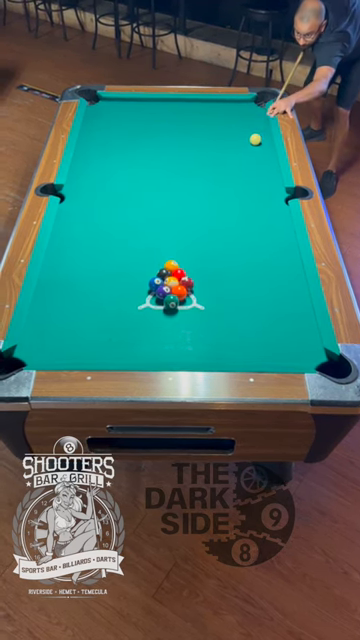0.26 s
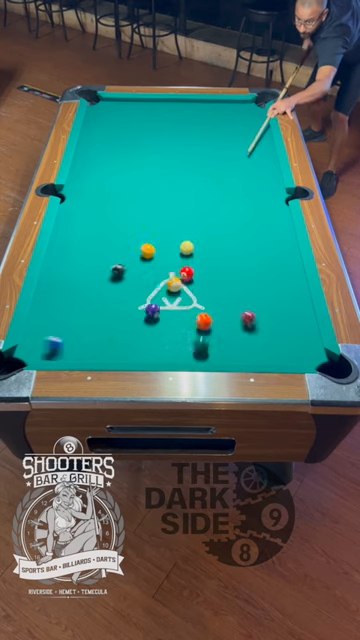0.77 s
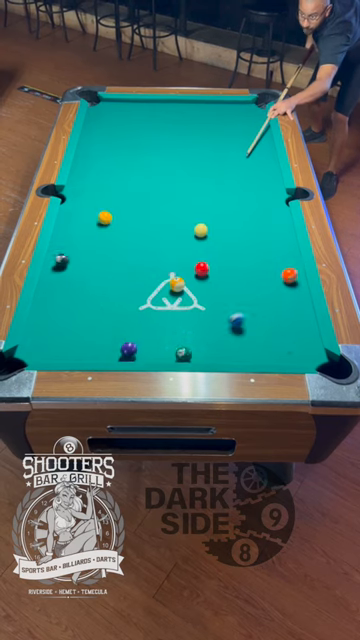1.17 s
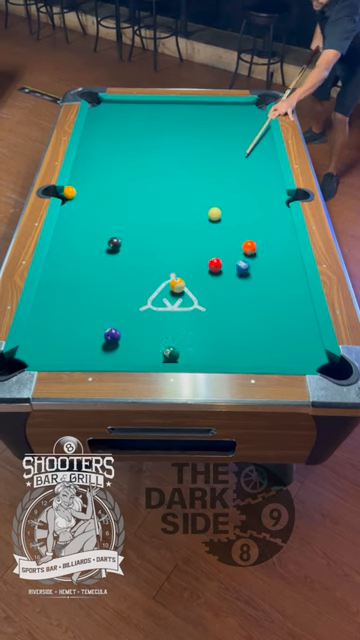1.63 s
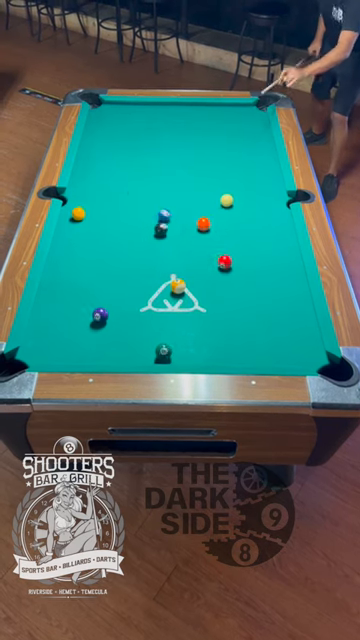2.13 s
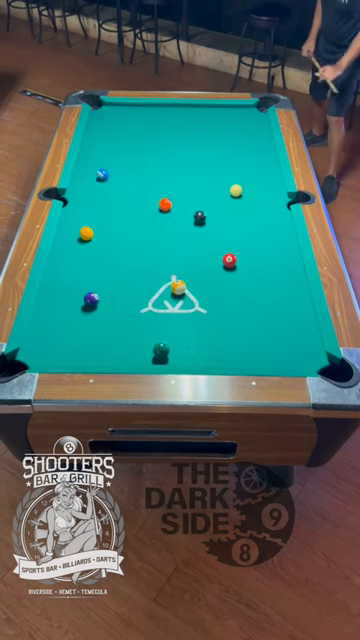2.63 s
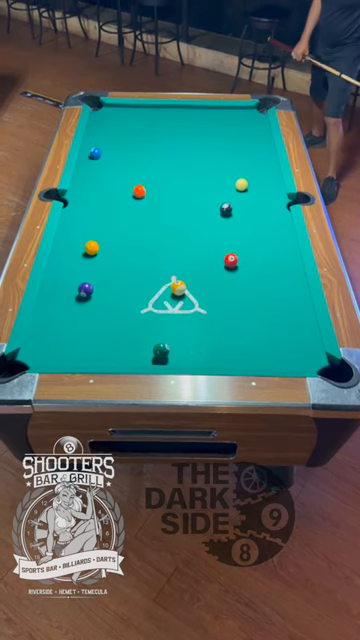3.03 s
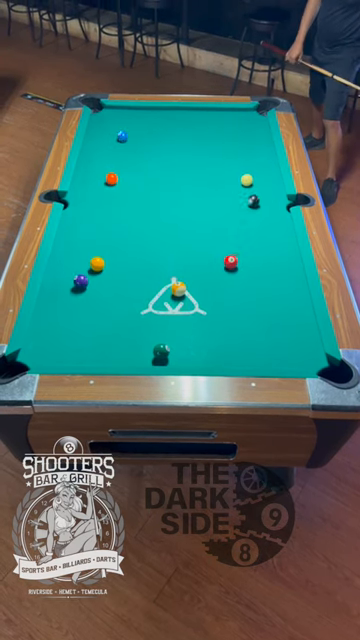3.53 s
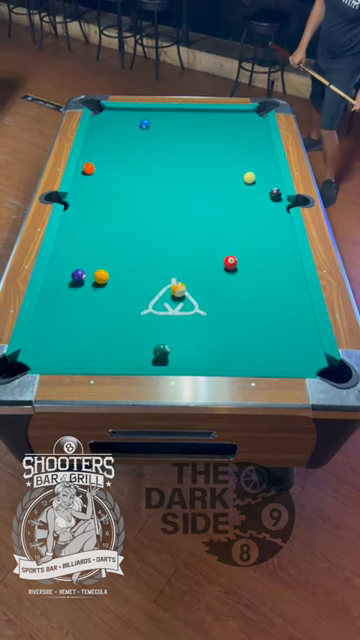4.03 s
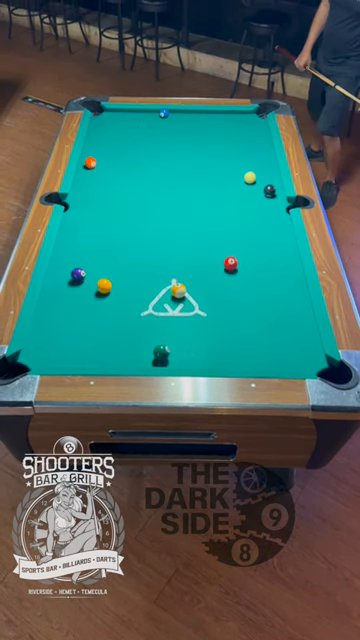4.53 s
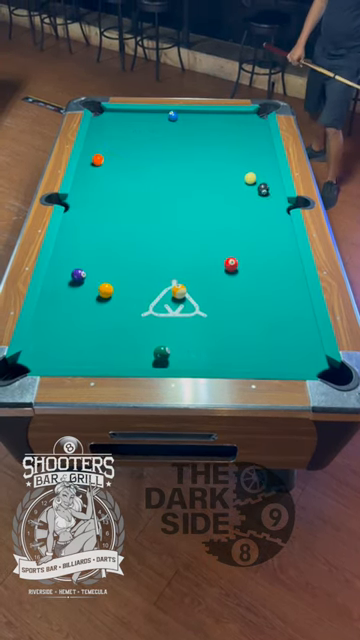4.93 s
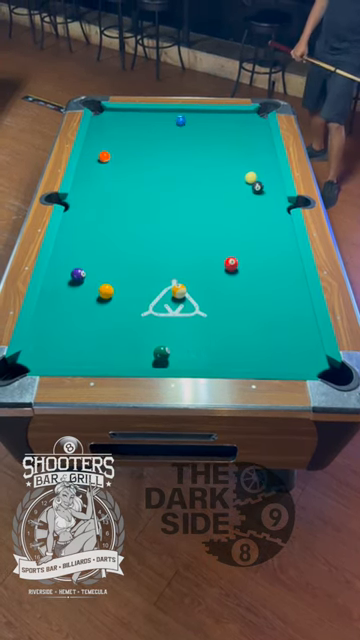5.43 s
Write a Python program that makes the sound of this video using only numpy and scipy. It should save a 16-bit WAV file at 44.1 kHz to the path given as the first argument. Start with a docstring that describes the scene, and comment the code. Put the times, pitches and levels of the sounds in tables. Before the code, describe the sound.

A cue snaps into a ball, a huge sharp pool break cracks, then lighter clacks and hollow wooden knocks as pocketed balls drop and roll away.

```python
"""Low rumble and faint hiss of a quiet bar, then a break shot on a coin-operated pool table.
The cue strikes (dull knock, bright snap in the room); the cue ball hops and cracks into the rack,
a mid-band noise swelling just before. Balls clack (pulses, reflections) and thump cushions (low modes).
Pocketed balls knock on the wooden return (cabinet modes) and roll down it (noise through those modes).
A limiter ducks at the loud peaks and recovers."""
import sys
import numpy as np
from scipy import signal
from scipy.fft import rfft, irfft
from scipy.io import wavfile
from scipy.ndimage import uniform_filter1d, minimum_filter1d

SR = 44100
rng = np.random.default_rng(int(sys.argv[2]) if len(sys.argv) > 2 else 0)


def materialize(psi):
    """Save the field psi as 16-bit PCM at rate SR to the path in sys.argv[1].

    A 1-D psi becomes a single channel; in a 2-D psi each row is a channel.
    """
    bounded = np.clip(np.atleast_2d(psi).T, -1, 1)
    quanta = np.round(bounded * 32767).astype(np.int16)
    wavfile.write(sys.argv[1], SR, quanta)


N = 251007

# background level: t/s, rumble of room and of balls on the cloth/dB, hiss/dB
AIR_LEVELS = [(.4, -51.5, -66.5), (.65, -46.5, -59), (1.1, -51.5, -75), (3.1, -54, -77), (5.69, -57, -74)]
# background spectra: f/Hz, level/dB
RUMBLE_SPECTRUM = [(20, -31), (40, -12), (60, -9.5), (85, -3), (120, 1), (170, -11), (300, -9.5),
                   (500, -16), (800, -21), (1500, -31), (2500, -40.5), (5000, -70)]
HISS_SPECTRUM = [(300, -12.5), (1500, 5), (3000, -1.5), (6500, -9), (8500, -17), (11000, -31.5),
                 (16000, -33.5)]
# bar reverberation: f/Hz, t60/s
BAR_DECAY = [(60, 1.15), (150, 0.96), (400, 0.3431), (1000, 0.4274), (2500, .5), (6000, 0.5), (14000, 0.28)]
# stereo width of the diffuse field: f/Hz, side-to-mid/dB
STEREO_WIDTH = [(50, -20.5), (140, -17), (260, -10), (600, -3), (1200, -1.5), (2000, -3), (4000, -0.5),
                (8000, -1)]

# cue tip on cue ball: t/s, level/dB, room/dB
CUE_STRIKES = [(0.4279, -13.5, -10.5)]
# tip knock and shaft snap spectra: f/Hz, level/dB
TIP_SPECTRUM = [(60, -27), (200, 2), (400, -0.5), (900, 7.5), (1400, -2), (2200, -22.5), (5000, -25.5),
                (15000, -47.5)]
SHAFT_SPECTRUM = [(60, -22), (200, 1.5), (500, 1), (1200, -7.5), (2400, -12.5), (5000, -8.5), (8000, -10),
                  (11000, -15), (15500, -16)]
# tip and shaft resonances: f/Hz, width/Hz, lift/dB
TIP_RESONANCES = [(250, 80, 8.6), (515, 130, 7), (720, 130, 6), (1960, 180, 20)]
SHAFT_RESONANCES = [(905, 110, 7), (1350, 26, 13), (1504, 40, 22.5), (2900, 200, 7.5), (3560, 610, 7.5),
                    (4330, 46, 9), (5350, 18, 12), (6860, 27, 15)]

# ball on cushion or slate: t/s, level/dB, hardness/dB
CUSHION_HITS = [(.428, -41, -3.5), (0.547, -36.5, 12.5), (0.607, -25, 14.5), (.719, -19.5, 16),
                (3.26, -44.5, 0.5)]
# cushion spectrum: f/Hz, level/dB
CUSHION_SPECTRUM = [(30, -31), (60, -5), (130, -6), (200, -7), (320, -12), (700, -17), (1200, -25),
                    (2500, -40.5), (8000, -69)]
# table resonances: f/Hz, width/Hz, lift/dB
TABLE_RESONANCES = [(57, 11, 2), (104.5, 18, 4.4), (154.3, 11.2, 14.25)]

# single knock on wood or slate, in a hop or against the return's wall:
# t/s, level/dB, bass/dB, treble/dB, main resonance f/Hz, its lift/dB, room/dB
SINGLE_KNOCKS = [(.4935, -29.5, 3, -15, 923, 8, -33), (3.154, -50.5, 1, -8.5, 500, 12, -1),
                 (3.265, -44.5, 1, -11, 1310, 10, -20), (4.02, -41.5, -7.5, -14.5, 1830, 8.5, -9),
                 (4.811, -49, -3.5, -12, 1450, 15, -12.5), (4.992, -45.5, 8, -10, 553, 12, -22),
                 (5.119, -40.5, -6.5, -15, 1570, 6, -25), (5.243, -31.5, -13, 14, 1945, 21, -29),
                 (5.416, -38.5, -10, 6.5, 1660, 20, -15), (5.424, -36, -11, -7.5, 2020, 17.5, -10.5)]
# ball drops into a pocket or down a step of the return, lands and bounces:
# t/s, level/dB, bass/dB, treble/dB, main resonance f/Hz, its lift/dB, table boom/dB
BALL_DROPS = [(1.052, -31.5, -16.5, -6, 1520, -3, -62), (1.057, -23.5, -8.5, -23, 850, 5, -52),
              (1.079, -31, -9.5, -13, 291, 13.5, -37.5), (2.515, -24, -10, -1, 979, 8.5, -31.5),
              (2.555, -22, -3, -2, 1410, 2, -31), (2.564, -22.5, -3.5, -6, 504, 2, -42.5),
              (2.683, -32, -1, 7.5, 2430, 7.5, -38), (2.693, -23.5, -10, -0.5, 1645, 4.5, -33.5),
              (2.723, -28.5, 3.5, -3.5, 1310, 11, -32), (2.759, -30, -11.5, -8, 421, 9.5, -48),
              (2.818, -36.5, -1.5, -6, 490, -3, -45), (4.272, -27.5, -1.5, -3, 193, 16.5, -34),
              (4.326, -28, 5, 1, 970, 4, -32), (4.36, -42, 12, -1, 1450, -9, -40.5),
              (4.633, -37, 9, -13.5, 665, 5.5, -56.5), (4.672, -42, 0, -23.5, 805, 2, -49.5),
              (5.229, -27, 0.5, 0.5, 1143, 11.5, -60), (5.241, -30, 5.5, 13, 335, 14.5, -57),
              (5.255, -27, 4, -2.5, 221, 17.5, -62), (5.586, -41.5, -4, 6.5, 935, 7.5, -48.5),
              (5.595, -31.5, -9, -11.5, 313, -1.5, -46)]
# cabinet wood spectrum: f/Hz, level/dB
WOOD_SPECTRUM = [(30, -29), (70, -8), (170, -9.5), (350, 1.5), (900, -1), (1300, -7), (2100, -13.5),
                 (2700, -21.5), (5000, -39), (8500, -48.5), (15000, -72.5)]
# cabinet resonances: f/Hz, width/Hz, lift/dB
CABINET_RESONANCES = [(159.3, 63, 8.8), (291, 13, 5.3), (422, 16, 1.4), (519.5, 55, 4.5), (729, 18, 5.1),
                      (804, 31, 6), (986.4, 50, 3.8), (1421, 130, 3), (1450, 23, 5.8), (1730, 38, 6.2),
                      (1934, 65, 3.8)]
# wooden panel ring time: f/Hz, t60/s
PANEL_DECAY = [(150, .12), (1500, .05), (6000, .065)]
# cabinet at the two microphones: f/Hz, left-right/dB, left's lead/rad
CABINET_AT_MICS = [(600, -0.5, 0.196), (1100, 1.5, -.8), (2100, -4, -1.1), (4500, 4, -0.13)]

# single balls meet and jolt the table: t/s, level/dB, treble/dB, jolt/dB
SINGLE_CLACKS = [(0.792, -6.5, -11, -58), (1.0527, -35, 13, -63), (1.088, -48.5, 23, -35),
                 (1.3034, -43.5, 2, -36.5), (1.329, -33.5, 13.5, -35), (1.4108, -43, 16, -36.5),
                 (1.4687, -57, 13, -38.5), (1.7098, -40.5, 11.5, -36.5), (1.808, -47, 10, -40.5),
                 (1.858, -59, 8.5, -47), (2.3542, -55.5, 3, -42), (2.442, -57.5, 6, -48),
                 (5.234, -50, 24, -53)]
# ball contact spectrum: f/Hz, level/dB
BALL_SPECTRUM = [(100, -39.5), (500, -15), (1000, -6.5), (1900, 8), (3000, 0), (4200, -12), (5500, -21.5),
                 (8700, -27), (10500, -39), (15000, -40.5)]
# balls on the cloth at the two microphones: f/Hz, left-right/dB, left's lead/rad
BALLS_AT_MICS = [(1090, 1.5, -0.37), (2130, -3, 1.5), (4500, 5, .8)]

# ball speed in the return, as the level of the murmur's upper range: t/s, level/dB
RETURN_SPEED = [(2.9, -56.5), (3.0, -67.5), (3.35, -71.5), (3.55, -62.5), (3.77, -63), (3.92, -62.5),
                (4.04, -61), (4.24, -58), (4.38, -52), (4.66, -76.5), (5.18, -66), (5.36, -63),
                (5.57, -63.5), (5.69, -68)]
# rolling spectrum: f/Hz, level/dB
ROLL_SPECTRUM = [(60, -19.5), (150, -0.5), (350, 0), (550, 2), (1000, -5), (1900, -21.5), (2700, -39.5),
                 (8000, -55)]

LENGTH = 2 ** 15  # samples in one event
HZ = np.maximum(np.arange(LENGTH + 1) * SR / (2 * LENGTH), 1)
AGE_S = np.arange(LENGTH) / SR
OCTAVES_HZ = 62.5 * 2 ** np.arange(9)
LEFT_RIGHT = np.array([[.5], [-.5]])  # halves a left-right difference

# cue ball into the rack
RACK_S, RACK_DB, RACK_TREBLE_DB, RACK_PAN_DB = 0.5956, 13, -4.5, 2
# fainter clacks are farther: more room
CLACK_ROOM_DB, CLACK_TYPICAL_DB, ROOM_DB_PER_DB_FAINTER = -13.5, -48, 0.24


def from_db(db):
    """Decibels to amplitude gain."""
    return 10 ** (np.asarray(db) / 20)


def at_hz(points, hz):
    """Interpolate a table on a log-frequency axis."""
    f, value = np.transpose(points)
    return np.interp(np.log(hz), np.log(f), value)


def in_time(rows):
    """Interpolate each column of a time table at every sample."""
    s, *columns = np.transpose(rows)
    return [np.interp(np.arange(N) / SR, s, c) for c in columns]


def lifts(modes):
    """dB that resonances add to a spectrum: Lorentzian peaks summed in power."""
    power = sum((from_db(db) ** 2 - 1) / (1 + (2 * (HZ - hz) / width) ** 2) for hz, width, db in modes)
    return 10 * np.log10(np.maximum(1 + power, .1))


def many_modes(spacing_hz, spread_db):
    """Random dB peaks and valleys of a body with closely packed modes."""
    return spread_db * np.interp(HZ / spacing_hz, np.arange(LENGTH), rng.standard_normal(LENGTH))


def shelf(zero_hz, full_hz):
    """Ramp in log frequency from 0 to 1."""
    return np.clip(np.log(HZ / zero_hz) / np.log(full_hz / zero_hz), 0, 1)


def colour(x, curve_db):
    """Minimum-phase filter of unit power with the given shape."""
    gain = from_db(curve_db)
    gain = gain / np.sqrt(np.mean(gain ** 2))
    # folding the cepstrum onto positive time makes the response causal
    cepstrum = irfft(np.log(gain))[:LENGTH]
    cepstrum[1:] *= 2
    response = irfft(np.exp(rfft(cepstrum, 2 * LENGTH)))[:LENGTH]
    return signal.fftconvolve(x, response[None], axes=-1)[:, :x.shape[-1]]


def diffuse(size):
    """White stereo noise from all sides: alike in the bass, wide in the treble."""
    mid, side = rfft(rng.standard_normal((2, size)))
    hz = np.maximum(np.arange(len(mid)) * SR / size, 1)
    width = from_db(at_hz(STEREO_WIDTH, hz))
    return irfft((mid + side * width * [[1], [-1]]) / np.sqrt(1 + width ** 2), size)


def reflections(delay_s, build_cycles):
    """Octave envelopes of dense bar reflections: lows build up later, each octave with its own t60."""
    age_s, hz = np.maximum(AGE_S - delay_s, 0), OCTAVES_HZ[:, None]
    build_up = 1 - np.exp(-age_s * hz / build_cycles)
    return build_up * from_db(-60 * age_s / at_hz(BAR_DECAY, hz))


def scatter(envelopes):
    """Fresh reflections, as from a new spot on the table: octave bands of noise under the envelopes."""
    hz = np.clip(HZ[::2], OCTAVES_HZ[0], OCTAVES_HZ[-1])
    octaves_away = np.log2(hz / OCTAVES_HZ[:, None])
    weights = np.maximum(1 - abs(octaves_away), 0)
    bands = irfft(rfft(diffuse(LENGTH)) * weights[:, None])
    return np.sum(bands * envelopes[:, None], axis=0)


def contact():
    """One-sample click with the energy of 3 ms of unit-power sound."""
    return np.sqrt(.003 * SR) * (AGE_S == 0) * np.ones((2, 1))


def add(out, s, sound, db, pan_db=0):
    """Place a sound in time and between the channels."""
    at = round(s * SR)
    out[:, at:at + LENGTH] += (sound * from_db(db + LEFT_RIGHT * pan_db))[:, :N - at]


def wobble(per_s):
    """Random control with per_s new values a second, joined by straight lines."""
    return np.interp(np.arange(N) / SR * per_s, np.arange(LENGTH), rng.standard_normal(LENGTH))


def heard_from(x, stereo):
    """Level and phase differences between two microphones, caused by the source's place."""
    hz = np.maximum(np.arange(N + 1) * SR / (2 * N), 1)
    table = np.array(stereo)
    pan_db, lead_rad = at_hz(table[:, :2], hz), at_hz(table[:, ::2], hz)
    response = from_db(LEFT_RIGHT * pan_db) * np.exp(1j * LEFT_RIGHT * lead_rad)
    return irfft(rfft(x, 2 * N) * response)[:, :N]


def background(boom_db=-5, boom_hz=57, boom_width_hz=10):
    """Low noise with one booming room mode, and faint hiss."""
    rumble_db, hiss_db = in_time(AIR_LEVELS)
    rumble = colour(diffuse(N), at_hz(RUMBLE_SPECTRUM, HZ))
    boom_curve_db = -20 * np.log10(1 + ((HZ - boom_hz) / boom_width_hz) ** 2)
    boom = from_db(boom_db) * colour(diffuse(N), boom_curve_db)
    hiss = colour(diffuse(N), at_hz(HISS_SPECTRUM, HZ))
    return from_db(rumble_db) * (rumble + boom) + from_db(hiss_db) * hiss


def cue(touch_db=-4, knock_db=-0.5, knock_t60_s=0.025, snap_decay_db_per_s=45):
    """Tip contact gives a short dull knock; the shaft's bright snap fills the room."""
    out = np.zeros((2, N))
    tip = at_hz(TIP_SPECTRUM, HZ) + lifts(TIP_RESONANCES)
    shaft = at_hz(SHAFT_SPECTRUM, HZ) + lifts(SHAFT_RESONANCES)
    # extra decay on top of the bar's
    room = reflections(0.00038, 1.2) * from_db(-snap_decay_db_per_s * AGE_S)
    for s, db, room_db in CUE_STRIKES:
        knock = from_db(knock_db - 60 * AGE_S / knock_t60_s) * diffuse(LENGTH)
        knock = knock + from_db(touch_db) * contact()
        snap = from_db(room_db) * scatter(room)
        add(out, s, colour(knock, tip) + colour(snap, shaft), db)
    return out


def table_pushes(boom_hardness_db=-8, jolt_hardness=0.59):
    """Cushion hits, clack jolts (hardened by a share of the treble), drop booms: s, level dB, hardness dB."""
    jolts = [(s, jolt_db, jolt_hardness * treble_db) for s, _, treble_db, jolt_db in SINGLE_CLACKS]
    booms = [(s, boom_db, boom_hardness_db) for s, *_, boom_db in BALL_DROPS]
    return list(CUSHION_HITS) + jolts + booms


def thumps():
    """Soft pushes, as from rubber cushions, set the table's low modes booming."""
    out, room = np.zeros((2, N)), reflections(0.0011, 0.92)
    for s, db, hard_db in table_pushes():
        shape = at_hz(CUSHION_SPECTRUM, HZ) + lifts(TABLE_RESONANCES) + hard_db * shelf(190, 730)
        add(out, s, colour(scatter(room), shape), db)
    return out


def cabinet_blows(drop_room_db=-9):
    """Drops, then single knocks: s, level dB, bass dB, treble dB, Hz, lift dB, room dB."""
    return [(*drop[:-1], drop_room_db) for drop in BALL_DROPS] + list(SINGLE_KNOCKS)


def ringing(hz, t60_s, spread_db, max_cycles=114):
    """Modes rung by one blow: random strengths and stereo lags; max_cycles caps t60, so highs die sooner."""
    hz = np.asarray(hz)
    strength, lag, turn = rng.standard_normal((3, len(hz)))
    phase = 2 * np.pi * turn + lag * from_db(at_hz(STEREO_WIDTH, hz)) * [[1], [-1]]
    age_s = AGE_S[:LENGTH // 2]
    mode_t60_s = np.minimum(t60_s, max_cycles / hz)[:, None]
    tones = np.exp(2j * np.pi * hz[:, None] * age_s) * from_db(-60 * age_s / mode_t60_s)
    sound = ((from_db(spread_db * strength) * np.exp(1j * phase)) @ tones).real
    return np.pad(sound, ((0, 0), (0, LENGTH - len(age_s))))


def knocks(swell_s=0.00099, swell_cycles=3.1, wood_db=5.0, strike_db=-10,
           ring_db=-22, ring_t60_s=0.096, ring_spread_db=2.5):
    """A blow rattles the cabinet and rings its main modes, plus one resonance of the panel struck."""
    out, room = np.zeros((2, N)), reflections(0.003, 0.61)
    hz_col = OCTAVES_HZ[:, None]
    swell = 1 - np.exp(-AGE_S / (swell_s + swell_cycles / hz_col))
    panels = swell * from_db(wood_db - 60 * AGE_S / at_hz(PANEL_DECAY, hz_col))
    cabinet = at_hz(WOOD_SPECTRUM, HZ) + lifts(CABINET_RESONANCES)
    cabinet = cabinet + many_modes(spacing_hz=40.44, spread_db=3.5) * shelf(1100, 3000)
    main_hz = [mode[0] for mode in CABINET_RESONANCES]
    for s, db, bass_db, treble_db, hz, lift_db, room_db in cabinet_blows():
        shape = cabinet + lifts([(hz, hz * 0.14, lift_db)])
        shape = shape + bass_db * shelf(930, 190) + treble_db * shelf(590, 2600)
        blow = from_db(strike_db) * contact() + scatter(np.hypot(panels, from_db(room_db) * room))
        ring = from_db(ring_db) * ringing(main_hz + [hz], ring_t60_s, ring_spread_db)
        add(out, s, colour(blow + ring, shape), db)
    return out


def crack_swell(db=-22, pan_db=-18, rise_db_per_s=1800, centre_hz=1750, width_hz=650):
    """Mid-band noise on the right swells in over the few ms before the rack's crack and stops there."""
    ahead_s = RACK_S - np.arange(N) / SR
    level = from_db(db - rise_db_per_s * abs(ahead_s)) * (ahead_s > 0)
    band_db = -20 * np.log10(1 + ((HZ - centre_hz) / width_hz) ** 4)
    return colour(diffuse(N), band_db) * level * from_db(LEFT_RIGHT * pan_db)


def ball_contacts():
    """Rack crack, then single clacks: s, level dB, room dB, treble dB, left-right dB."""
    rack = [(RACK_S, RACK_DB, RACK_TREBLE_DB, RACK_PAN_DB)]
    singles = [(s, db, treble_db, 0) for s, db, treble_db, _ in SINGLE_CLACKS]
    return [(s, db, CLACK_ROOM_DB + ROOM_DB_PER_DB_FAINTER * (CLACK_TYPICAL_DB - db), treble_db, pan_db)
            for s, db, treble_db, pan_db in rack + singles]


def clacks(rail_db=9, rail_t60_s=0.11, rail_build_s=0.0064, pulse_db=-1.5, room_bright_db=5.0):
    """Hard balls touch for a fraction of a ms: one pulse, scatter off the rails, then the room."""
    out, room = np.zeros((2, N)), reflections(0.018, 6.4)
    rails = from_db(rail_db - 60 * AGE_S / rail_t60_s) * np.minimum(AGE_S / rail_build_s, 1) ** 4
    # balls beam their upper middle sideways, into the room
    beamed_db = room_bright_db * (shelf(1700, 4000) - shelf(4400, 9100))
    for s, db, room_db, treble_db, pan_db in ball_contacts():
        shape = at_hz(BALL_SPECTRUM, HZ) + treble_db * shelf(3200, 7000)
        near = from_db(pulse_db) * contact() + from_db(room_db) * rails * diffuse(LENGTH)
        add(out, s, colour(near, shape), db, pan_db)
        add(out, s, colour(scatter(room), shape + beamed_db), db + room_db)
    return out


def roll_controls(start_s=2.9, swell_db_per_s=105, mean_db=-49.5, mean_bright_db=-5,
                  level_follows=0.37, bright_follows=1.31):
    """Level and brightness in dB, both rising with ball speed (follows: dB per dB); swells in to start_s."""
    speed_db, = in_time(RETURN_SPEED)
    speed_db = speed_db - np.mean(RETURN_SPEED, axis=0)[1]
    swell_db = swell_db_per_s * np.minimum(np.arange(N) / SR - start_s, 0)
    return mean_db + level_follows * speed_db + swell_db, mean_bright_db + bright_follows * speed_db


def rolling(bumps_per_s=45, bump_db=1.5, mode_db=-8, wander_db=4.5, wander_per_s=11, split_hz=680):
    """Balls on the return's uneven track wake varying cabinet modes; the faster, the brighter."""
    level_db, bright_db = roll_controls()
    track = diffuse(N) * from_db(level_db + bump_db * wobble(bumps_per_s))
    woken = 0
    for hz, width_hz, _ in CABINET_RESONANCES:
        mode = signal.lfilter(*signal.iirpeak(hz, hz / width_hz, fs=SR), track)
        woken = woken + from_db(mode_db + wander_db * wobble(wander_per_s)) * mode
    murmur = colour(track + woken, at_hz(ROLL_SPECTRUM, HZ) + lifts(CABINET_RESONANCES))
    low = signal.sosfiltfilt(signal.butter(2, split_hz, fs=SR, output="sos"), murmur)
    return low + from_db(bright_db) * (murmur - low)


def scene():
    """Cue, table, cabinet and ball sounds, and a mid-band noise swell before the crack, over the background."""
    cabinet = heard_from(knocks() + rolling(), CABINET_AT_MICS)
    balls = heard_from(clacks(), BALLS_AT_MICS)
    return background() + cue() + thumps() + cabinet + crack_swell() + balls


def limiter(x, ceiling_db=-8, release_db_per_s=65, window=25):
    """Gain drops just ahead of any peak over the ceiling and creeps back; window in samples."""
    over_db = np.maximum(20 * np.log10(abs(x).max(axis=0) + 1e-9) - ceiling_db, 0)
    ramp_db = release_db_per_s * np.arange(N) / SR
    gain_db = ramp_db - np.maximum.accumulate(over_db + ramp_db)
    return x * from_db(uniform_filter1d(minimum_filter1d(gain_db, size=window), size=window))


def record(dry, cutoff_hz=15900):
    """Limiter, then a steep low-pass."""
    return signal.sosfilt(signal.ellip(10, .1, 80, cutoff_hz, fs=SR, output="sos"), limiter(dry))


dry = scene()
out = record(dry)
materialize(out)
```